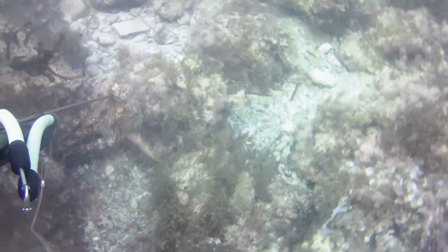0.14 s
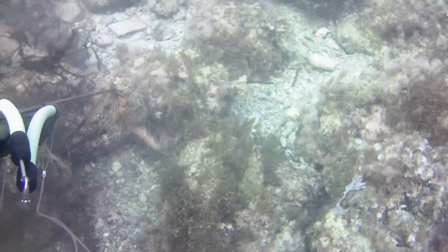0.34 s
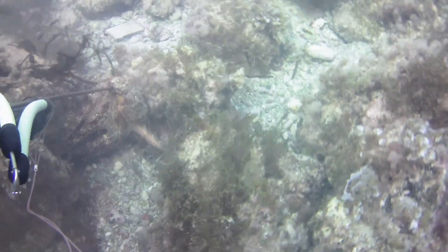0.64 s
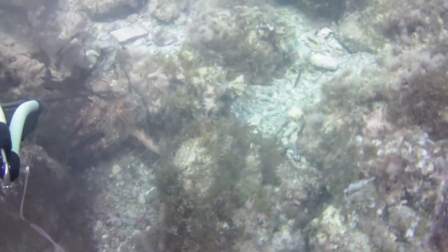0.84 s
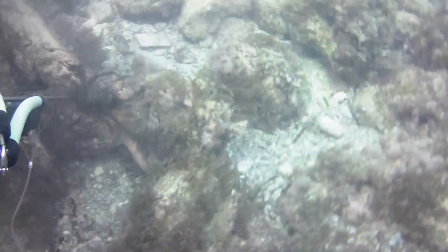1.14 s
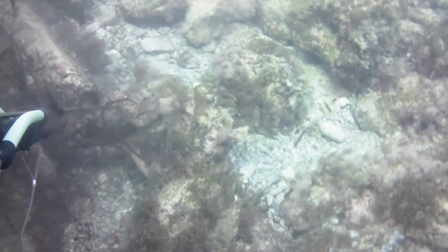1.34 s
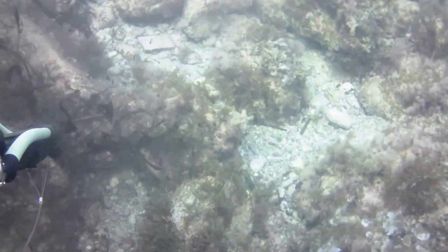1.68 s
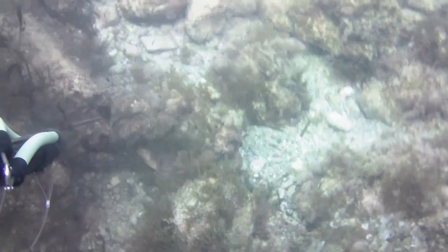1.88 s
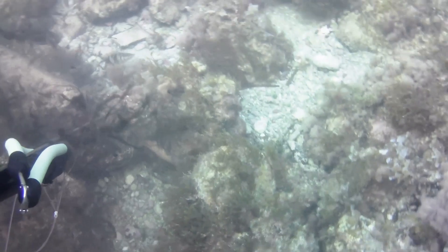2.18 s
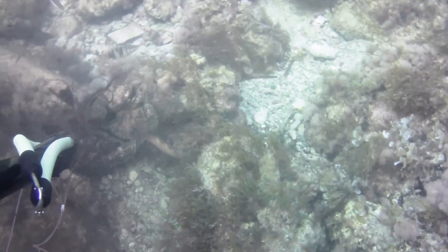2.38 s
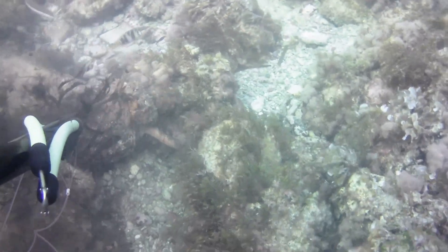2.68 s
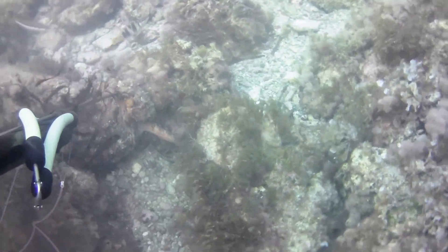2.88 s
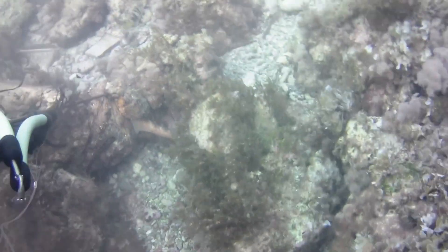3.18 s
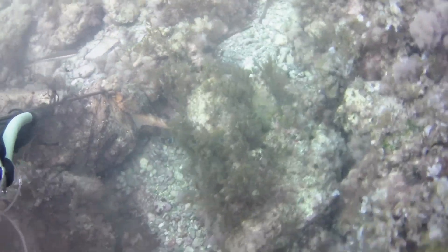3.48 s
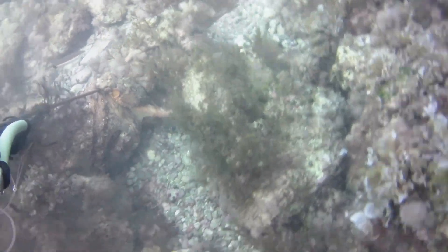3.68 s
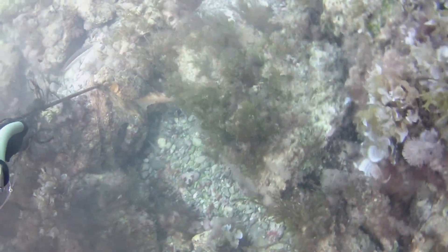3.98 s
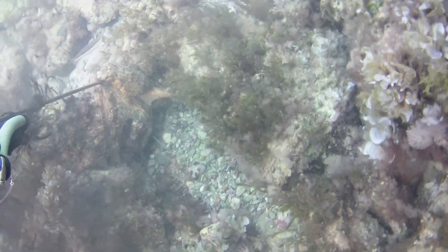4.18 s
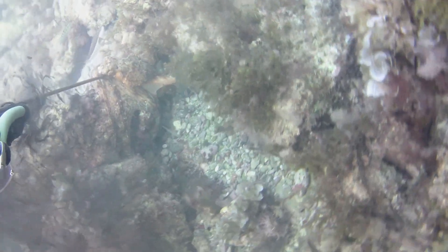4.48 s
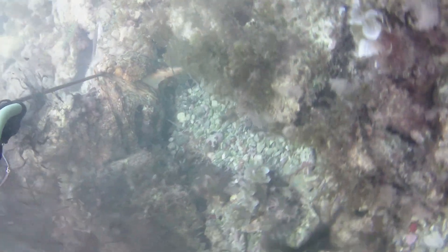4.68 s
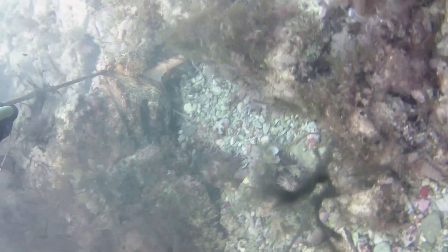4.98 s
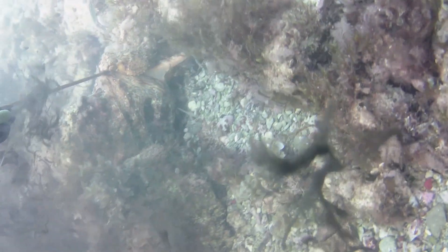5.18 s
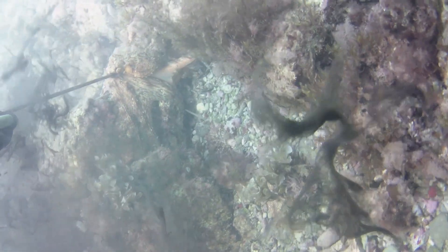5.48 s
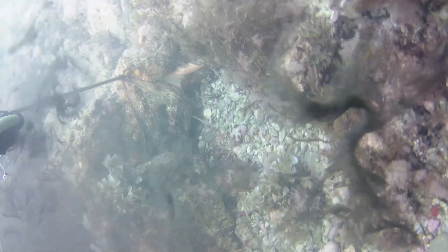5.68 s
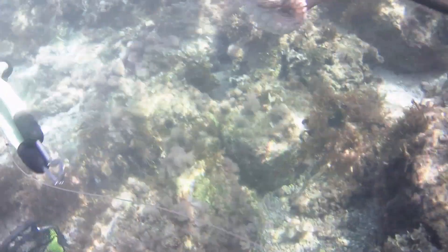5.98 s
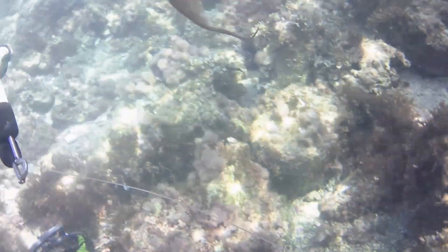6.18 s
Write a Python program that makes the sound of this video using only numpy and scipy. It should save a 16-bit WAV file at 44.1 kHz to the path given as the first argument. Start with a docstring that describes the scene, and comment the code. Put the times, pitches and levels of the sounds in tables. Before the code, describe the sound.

Heard from inside a waterproof case, a speargun fires with a violent double crack, then knocks, quiet clicks and a low watery wash trail off.

```python
"""Speargun shot over a shallow reef

The microphone sits inside a waterproof camera housing, close to a band-powered speargun: the trigger
clacks, the bands slam home and thuds follow. Blows, bumps, ticks and scrapes are short forces ringing the
housing's resonances; heavy blows also boom in the gun's body, and shoves leave it shuddering. Shaped
noise and ringing bubbles make the moving water, with far shrimp and a faint hiss behind."""
import sys
import numpy as np
from scipy import signal
from scipy.fft import rfft, irfft
from scipy.io import wavfile

SR = 44100
rng = np.random.default_rng(int(sys.argv[2]) if len(sys.argv) > 2 else 0)


def unload_wav(signal):
    """Save mono or channel-first audio to the path in sys.argv[1] as 16-bit WAV at rate SR, clipped to [-1, 1]."""
    wavfile.write(
        sys.argv[1],
        SR,
        np.round(np.clip(np.atleast_2d(signal).T, -1, 1) * 32767).astype(np.int16),
    )


N = 279594
AGE = np.arange(SR // 2) / SR   # seconds since a contact

# All levels are relative: a layer's own gain and the scene's gain come on top.
# Trigger release and recoil, then the bands' slam and rebound:
# start_s, level_db (peak of the ring), hardness_hz, rattle_db (against the push),
# main_db, second_db, low_db (housing modes), tuning (factor on the main mode, raises only),
# boom_db, boom_hz, rise_s, damping (factor), thump_db, body_tuning (factor)
SHOT_BLOWS = [(1.8406, 4, 6500, -18, -2, 3.5, -2.5, 0.94, -13.5, 183, .003, 1.8, -40.5, 0.99),
              (1.8450, -5, 804, -27, 0, 9.5, -2.5, 1.0, -23, 187, .0024, 1.8, -45, 0.76),
              (1.8492, -9, 802, -27, 2, 9.5, -3, 1.0, -20, 244, .002, 1.17, -45, 1.0),
              (1.8932, -0.5, 2600, -15, 10.5, 0.5, 11, 0.98, -1.5, 230, .003, 1.48, -20, 0.95),
              (1.9020, -10.5, 600, -22, 15, -1.5, 1.5, 1.0, -36, 192, .0046, 1.2, -41.5, 1.0)]
# Blows on the gun, columns as for the shot
KNOCK_BLOWS = [(0.6232, -21, 900, -26.5, 4, -4, 7, 1.01, -30, 245, 0.0057, 0.67, -40.5, 1.01),
               (0.8760, -23, 1100, -17, 3.5, -12, -5, 1.074, -20.5, 245, 0.012, 0.52, -61, 0.98),
               (0.933, -39, 900, -11, -4, -12.5, 1, 1.1, -24, 251, 0.012, 0.98, -68, 1.03),
               (2.4732, -6, 900, -30.5, -1.5, -4.5, -3, 1.047, -13.5, 168.4, 0.0042, 0.81, -40, 1.0),
               (2.4806, -22.5, 991, -37, 2.5, 2.5, 9, 1.05, -27.5, 290, 0.002, 1.02, -48, 0.95),
               (2.9174, -12.5, 733, -32, 8.5, -3.5, 10, 1.0, -16.5, 179.2, 0.0021, 1.3, -30.5, 1.0),
               (2.9230, -16.5, 1010, -25.5, 0, 4, 15, 1.0, -11.5, 238.4, 0.00099, 1.63, -39.5, 1.0),
               (3.0040, -19, 900, -23, 0, 1.5, 0, 1.02, -27, 273, 0.0019, 1.02, -38, 0.96),
               (3.027, -42, 900, -17, -11, -3, -0.5, 1.05, -33.5, 150, .0036, 1.4, -49.5, 1.0),
               (3.4095, -25.5, 744, -31, 7, -4, -8, 1.03, -34, 225, 0.0046, 0.78, -43, 1.0)]
# Soft bumps on the housing: start_s, level_db, hardness_hz, boom_db, boom_hz
SOFT_BUMPS = [(0.331, -39, 680, -55.5, 160), (0.531, -35.5, 900, -44.5, 145), (0.742, -40, 600, -54, 245),
              (0.791, -62, 405, -45, 185), (0.872, -32, 1000, -51, 245), (0.914, -38, 1200, -42, 245),
              (1.027, -42.5, 775, -42, 210), (1.328, -33, 626, -40, 250), (1.397, -35, 586, -40, 250),
              (1.454, -35, 650, -39.5, 235), (1.493, -38, 1110, -39, 240), (1.678, -61, 450, -45.5, 190),
              (1.972, -36.5, 1000, -39.5, 175), (2.124, -30, 1064, -50, 180), (2.141, -35.5, 556, -61, 180),
              (2.432, -36.5, 790, -57, 180), (2.519, -31.5, 790, -48.5, 245), (2.619, -46, 450, -52.5, 245),
              (2.708, -45, 570, -70, 180), (2.754, -38, 701.5, -54, 200), (2.817, -37.5, 599, -64, 180),
              (2.992, -35, 900, -42, 246), (3.058, -42.5, 1000, -46, 245), (3.083, -40, 900, -35, 170),
              (3.095, -29.5, 600, -56, 230), (3.194, -31.5, 896, -60, 180), (3.223, -28.5, 605, -39, 234.6),
              (3.708, -38, 1600, -61.5, 200), (3.922, -41, 800, -51, 245), (3.988, -38, 1192, -69, 245),
              (4.072, -44, 1100, -72.5, 245), (4.127, -37.5, 501, -70, 245), (4.189, -34, 950, -69, 245),
              (4.79, -41, 900, -62, 245), (4.862, -44.5, 590, -52.5, 190), (5.014, -43.5, 813, -72, 245),
              (5.033, -37.5, 697, -69, 245), (5.226, -35, 1150, -62, 245), (5.329, -42, 1000, -69, 245),
              (5.412, -47, 900, -60, 230), (5.422, -34, 900, -47, 230), (5.458, -36, 990, -67.5, 245),
              (5.509, -39.5, 1290, -68.5, 245), (5.553, -42, 1098, -65, 245),
              (5.588, -39.5, 1088, -76.5, 245), (5.699, -39.5, 1200, -72, 245),
              (5.985, -35, 590, -57.5, 200), (6.043, -40.5, 1110, -72, 245), (6.263, -41, 700, -53.5, 180),
              (6.322, -34, 1000, -56, 180)]
# Sharp ticks, from line and reef life and from hard clicks within the gun's knocks: start_s, level_db,
# pitch_hz, rattle_db, width_octaves
SHARP_TICKS = [(0.166, -37.5, 1800, -11, 1.53), (0.248, -58, 2600, -12, 1.4), (0.379, -51, 3550, -12, 0.9),
               (0.538, -56, 1800, -6, 1), (0.66, -41, 2300, -13, 0.55), (0.672, -49, 2000, -6, .7),
               (0.6956, -47, 3900, -10, 0.96), (0.8795, -39, 1640, -15, 0.59),
               (0.981, -52.5, 1990, -12, .6), (1.1986, -50, 2320, -6, 1.16), (1.25, -54, 1910, 1, 0.27),
               (1.3216, -48.5, 2400, -5, 2), (1.378, -49.5, 2020, -6, 1.6),
               (1.4523, -48.5, 1700, -12, 0.78), (1.516, -33.5, 2450, -4, 0.92),
               (2.057, -49, 4860, -13, 1.1), (2.1065, -52.5, 3800, -28.5, 1.05),
               (2.138, -38, 2200, -5, 1.5), (2.2357, -46, 4710, -12, 1.17), (2.272, -50, 2000, -15, 1.3),
               (2.392, -45.5, 1480, -4, 1.24), (2.4733, -31, 2970, -31, 0.23),
               (2.486, -42.5, 1800, -10, 0.78), (2.7534, -35.5, 1600, 0, 1.56),
               (2.9245, -39.5, 4000, -9, 0.9), (2.928, -35, 3900, -8.5, 0.95),
               (2.9328, -37.5, 4000, -8, 1.1), (2.945, -40, 3320, -8, 1), (3.1043, -40, 2620, 14, 1.1),
               (3.144, -47.5, 3000, -10, 0.35), (3.2224, -30.5, 1940, -12.5, 1.2),
               (3.3642, -47.5, 1900, -6, 2.1), (3.395, -44.5, 1180, -13, 0.73),
               (3.504, -51.5, 2130, 9.5, 0.92), (3.632, -54, 2160, -20.5, 0.65),
               (3.7406, -38.5, 1795, -5, 0.87), (3.8162, -42, 3270, -8, 1.1), (3.9236, -41, 1700, -20, 1.6),
               (4.03, -57.5, 4680, -20, 1.06), (4.386, -35.5, 2320, -5, 1.54),
               (4.722, -43.5, 2930, -14, 0.82), (4.83, -51, 2010, -3, .4), (4.893, -46, 1450, -1, 0.87),
               (5.034, -31, 2573, -10, 1.25), (5.1530, -33.5, 2650, -19, 1.44),
               (5.331, -57, 2200, -12, 1.02), (5.4213, -46, 3200, -2, 0.28), (5.430, -47, 3150, 4, .3),
               (5.467, -42.5, 3300, -4, 0.57), (5.501, -56.5, 1840, -8, .4), (5.861, -51, 2180, -15, 1)]
# Housing resonances, main and second first, the two low ones last: pitch_hz, width_hz, level_db
HOUSING_MODES = [(566, 36, 0), (713, 36, -3), (865, 70, -6), (985, 110, -11), (1265, 100, -12),
                 (1450, 100, -17), (1605, 120, -12.5), (2040, 170, -13), (2460, 200, -14.5),
                 (3020, 150, -12), (3550, 300, -25), (4170, 250, -20.5), (5200, 600, -31),
                 (7100, 1400, -33), (10500, 3000, -43), (453, 40, -13), (405, 70, -15)]
# Low modes of the gun's body before tuning and damping: pitch_hz, t60_s
BODY_MODES = [(95, 0.15), (142, 0.24), (180, 0.17), (245, 0.1), (305, 0.065)]
# Gritty scrapes of line and gear: start_s, length_s, level_db, low_hz, high_hz
LINE_SCRAPES = [(0.662, 0.032, -60.5, 1800, 3400), (0.685, 0.024, -61, 2760, 5200),
                (0.883, 0.03, -69.5, 2470, 6200), (1.872, 0.046, -40, 1495, 4500),
                (2.913, 0.025, -42, 1200, 2200), (4.756, 0.19, -70.5, 900, 1892),
                (4.943, 0.09, -69, 788, 1980), (5.406, 0.055, -64, 2620, 3550),
                (5.44, 0.044, -63, 1500, 3200), (6.246, 0.13, -58, 790, 1370)]
# Shoves that set the gun shuddering: start_s, level_db
GUN_SHOVES = [(0.0, -62.5), (0.53, -61), (0.87, -55), (1.44, -58), (1.85, -47.5), (2.12, -53.5),
              (2.5, -56.5), (2.92, -51)]
# Single bubbles: start_s, level_db, pitch_hz, rise_s, t60_s, slide_octaves_per_s
SINGLE_BUBBLES = [(0.712, -37, 420, 0.0015, 0.03, 3), (1.972, -43, 900, 0.0026, 0.044, -1),
                  (2.302, -39, 443, 0.0016, 0.042, -5), (4.767, -47, 1260, .002, .03, -2.5),
                  (4.792, -37, 504, 0.0006, 0.034, 14), (4.813, -38.5, 770, .0006, 0.08, 4.5),
                  (4.855, -48, 869, .003, 0.052, 5.5), (4.884, -33, 534.6, 0.021, .1, 4),
                  (4.947, -46, 844, .005, 0.053, 5), (5.4215, -39.5, 487, 0.0018, 0.053, 8),
                  (5.458, -51, 640, 0.00055, 0.045, 14), (5.226, -43, 520, 0.0022, .04, -13),
                  (5.329, -44.5, 569, .001, 0.061, -3.5), (5.558, -36.5, 482, 0.0017, 0.031, -2),
                  (5.599, -41.5, 443, 0.0019, 0.034, 7)]
# Swirls of water against the case: start_s, length_s, level_db, low_hz, high_hz
WATER_SWIRLS = [(0.998, 0.13, -55.5, 523, 900), (4.115, 0.12, -53, 296, 592),
                (4.294, 0.27, -67.5, 330, 514), (6.257, 0.16, -50.5, 266, 856)]
# Water moving past the case: time_s, level_db
FLOW_LEVEL = [(0.0, -65.5), (0.39, -66), (0.78, -57.5), (1.77, -65), (1.99, -56.5), (2.14, -60),
              (2.59, -57.5), (2.77, -63), (2.93, -59), (3.44, -64), (3.55, -63), (3.92, -62.5),
              (4.1, -63.5), (5.0, -60.5), (5.21, -65), (5.54, -58.5), (5.83, -63.5), (6.34, -64)]
# Rumble of the hand working the gun: time_s, level_db
HANDLING_LEVEL = [(0.0, -61), (0.35, -74), (0.74, -58), (1.15, -61), (1.8, -64), (1.93, -53), (2.21, -63),
                  (2.58, -61), (2.84, -70), (3.0, -59), (3.49, -69.5), (4.68, -81), (5.05, -74.5),
                  (5.76, -83), (6.34, -74.5)]
# Colour of the wash: pitch_hz, density_db (per Hz)
WASH_SPECTRUM = [(71, -53.5), (120, -18.5), (344, -15), (473, -7.5), (560, 3), (649, -16), (703, -13),
                 (761, -13), (833, -9.5), (976, -10.5), (1170, -14), (1610, -35), (1800, -30), (2340, -59),
                 (3960, -120)]
# Colour of the handling rumble: pitch_hz, density_db (per Hz)
RUMBLE_SPECTRUM = [(13, -30.5), (22, -9), (45, -9), (114, -8), (173, -5.5), (204, -11), (247, -6.5),
                   (320, -17.5), (420, -47), (700, -120)]
# Colour of the fizz before its treble is dulled: pitch_hz, density_db (per Hz)
FIZZ_SPECTRUM = [(820, -30.5), (1400, -0.5), (1780, -13.5), (2000, 0.5), (2340, -13), (2730, -16.5),
                 (3050, -3), (3470, -15), (5330, -19.5), (6350, -21.5), (7420, -19), (7980, -18),
                 (8430, -20.5), (11900, -23.5), (12500, -27.5), (16200, -79), (22000, -120)]

TRIGGER_S, SLAM_END_S = SHOT_BLOWS[0][0], SHOT_BLOWS[-1][0]


def blows(table, rattle_t60_s, order, thin_hz):
    """Each blow rings the housing and sets the gun flexing."""
    out = np.zeros(N)
    for s, db, hardness_hz, rattle_db, main_db, second_db, low_db, tuning, *boom in table:
        push = contact(hardness_hz, rattle_db, rattle_t60_s, order)
        force = cut(push, thin_hz, "high", order=3)
        ring = peak_one(housing(force, main_db, second_db, low_db, tuning))
        add(out, s, from_db(db) * ring + flex(*boom))
    return out


def shaft(level_db=-25.5, dull_hz=650):
    """The spear rumbles along its track, as dull noise in the housing, until the bands slam home."""
    rub = np.zeros(N)
    add(rub, TRIGGER_S, rng.standard_normal(len(AGE)) * swell(SLAM_END_S - TRIGGER_S))
    return from_db(level_db) * peak_one(housing(cut(rub, dull_hz, "low"), main_db=-6.0))


def spray(level_db=-49, fade_db_per_s=428.5, thin_hz=2000, dull_hz=7000, direct_db=-28):
    """Tiny cavities collapse after the bands slam home: a bright crackle that dies away."""
    pops = cut(grains(per_s=700, spread_db=8), thin_hz, "high")
    pops = cut(pops, dull_hz, "low", order=4)
    crackle = rms_one(housing(pops) + from_db(direct_db) * pops)
    return fading(SLAM_END_S, level_db, fade_db_per_s) * crackle


def contact(hardness_hz, rattle_db, rattle_t60_s, order):
    """One push followed by a dying rattle; a soft contact has no treble."""
    force = from_db(rattle_db - 60 * AGE / rattle_t60_s) * rng.standard_normal(len(AGE)) / 2
    force[0] += 1
    return cut(force, hardness_hz, "low", order=order)


def housing(force, main_db=0, second_db=0, low_db=0, tuning=1, scatter_db=0):
    """The case rings; the place hit sets its mode strengths, a tight grip raises its main pitch."""
    hz, width_hz, db = np.array(HOUSING_MODES, float).T
    db = db + scatter_db * rng.standard_normal(len(db))
    db[:2] += main_db, second_db
    db[-2:] += low_db
    hz[0] *= max(tuning, 1)
    gains = from_db(db) * (-1.0) ** np.arange(len(db))   # successive modes alternate in sign
    return sum(gain * resonance(force, f, width) for gain, f, width in zip(gains, hz, width_hz))


def resonance(force, hz, width_hz):
    """One damped mode as a two-pole filter, gain 1 on top."""
    r = np.exp(-np.pi * width_hz / SR)
    feed = np.array([1, 0, -1]) * (1 - r * r) / 2
    back = [1, -2 * r * np.cos(2 * np.pi * hz / SR), r * r]
    return signal.lfilter(feed, back, force + 1e-18)


def flex(boom_db, boom_hz, rise_s, damping, thump_db=-90, tuning=1):
    """The gun's body booms, most near its boom pitch, damped by the water; a shove thumps the lowest mode."""
    hz, t60_s = np.array(BODY_MODES).T
    away_octaves = np.abs(np.log2(hz / boom_hz))
    gains = from_db(boom_db - np.minimum(38 * away_octaves, 21.5))   # 38 dB per octave, 21.5 dB at most
    gains[0] = from_db(thump_db)
    modes = np.zeros(len(AGE))
    for gain, f, t60 in zip(gains, hz, t60_s):
        modes += gain * from_db(-60 * damping * AGE / t60) * np.sin(2 * np.pi * f * tuning * AGE)
    return cut(modes * (1 - np.exp(-AGE / rise_s)), 65, "high")


def bumps(gain_db=-6, thin_hz=240, direct_db=-19):
    """Hand and gear bump the housing, some dull and some hard; the gun booms along."""
    out = np.zeros(N)
    for s, db, hardness_hz, boom_db, boom_hz in SOFT_BUMPS:
        push = contact(hardness_hz, rattle_db=-18.5, rattle_t60_s=0.074, order=4)
        force = cut(push, thin_hz, "high")
        ring = peak_one(housing(force, main_db=2.0, scatter_db=5.0) + from_db(direct_db) * force)
        boom = flex(boom_db, boom_hz, rise_s=0.0018, damping=1.0)
        add(out, s, from_db(db + gain_db) * ring + boom)
    return out


def ticks(gain_db=-4.5, direct_db=-30):
    """Tiny hard snaps, each in a band round its own pitch; part of the crack passes straight through."""
    out = np.zeros(N)
    for s, db, hz, rattle_db, octaves in SHARP_TICKS:
        edge = 2 ** (octaves / 2)
        snap = contact(hz * edge, rattle_db, rattle_t60_s=0.022, order=5)
        force = cut(snap, hz / edge, "high", order=5)
        ring = peak_one(housing(force) + from_db(direct_db) * force)
        add(out, s, from_db(db + gain_db) * ring)
    return out


def scrapes(direct_db=-28):
    """Uneven little slips crackle through the case and drive its resonances."""
    out = np.zeros(N)
    for s, length_s, db, low_hz, high_hz in LINE_SCRAPES:
        slips = cut(grains(per_s=360, spread_db=8)[:len(AGE)], high_hz, "low", order=4)
        slips = cut(slips, low_hz, "high", order=3)
        crackle = rms_one(housing(slips, scatter_db=5.0) + from_db(direct_db) * slips)
        add(out, s, from_db(db) * crackle * swell(length_s))
    return out


def sway(hz=41.3, t60_s=0.96, rise_s=0.015):
    """Each shove leaves the whole gun shuddering in one deep, slow mode."""
    out, age = np.zeros(N), np.arange(2 * SR) / SR
    envelope = from_db(-60 * age / t60_s) * (1 - np.exp(-age / rise_s))
    shudder = envelope * np.sin(2 * np.pi * hz * age)
    for s, db in GUN_SHOVES:
        add(out, s, from_db(db) * shudder)
    return out


def blips():
    """Single bubbles swell, ring and die away while their pitch slides."""
    out = np.zeros(N)
    for s, db, hz, rise_s, t60_s, slide in SINGLE_BUBBLES:
        pitch_hz = hz * 2 ** (slide * np.minimum(AGE, t60_s / 2))   # the slide stops at half the t60
        phase = 2 * np.pi * np.cumsum(pitch_hz) / SR
        envelope = from_db(db - 60 * AGE / t60_s) * (1 - np.exp(-AGE / rise_s))
        add(out, s, envelope * np.sin(phase))
    return out


def swirls():
    """Brief rushes of many small ringing bubbles."""
    out = np.zeros(N)
    for s, length_s, db, low_hz, high_hz in WATER_SWIRLS:
        rush = gurgle(260, low_hz, high_hz)[:len(AGE)]
        add(out, s, from_db(db) * rush * swell(length_s))
    return out


def gurgle(per_s, low_hz, high_hz, sharpness=12, count=10):
    """Small bubbles of many sizes ring for a few cycles; rms 1."""
    clicks = grains(per_s, spread_db=6.5)
    size = rng.integers(0, count, N)   # each click is dealt to one bubble size
    pitches_hz = np.geomspace(low_hz, high_hz, count)
    rings = sum(resonance(clicks * (size == k), hz, hz / sharpness) for k, hz in enumerate(pitches_hz))
    return rms_one(cut(cut(rings, low_hz / 2, "high"), 1300, "low", order=4))


def water(wash_gain_db=-5, gurgle_db=-5, rumble_gain_db=-3):
    """Water washes and gurgles round the case in uneven swells; blows stir it, the hand rumbles."""
    flow_db, handling_db = in_time(FLOW_LEVEL), in_time(HANDLING_LEVEL)
    surge = from_db(3.6 * drift(16))
    # every blow except the trigger's first stirs the water by its own level, and the water settles again
    stirred = sum(fading(s, db - 51.5, fade_db_per_s=75.5) for s, db, *_ in SHOT_BLOWS[1:] + KNOCK_BLOWS)
    wash = from_db(wash_gain_db) * noise(WASH_SPECTRUM) * surge
    bubbles = from_db(gurgle_db) * gurgle(per_s=26, low_hz=316, high_hz=900)
    rumble = from_db(handling_db + rumble_gain_db) * noise(RUMBLE_SPECTRUM)
    return np.hypot(from_db(flow_db), stirred) * (wash + bubbles) + rumble + fizz(flow_db, surge)


def fizz(flow_db, surge, level_db=-79.5, follows=0.13, patchy_db=3):
    """Fine bubbles hiss, following a share of the flow's swing; the shot leaves a fading cloud of them."""
    steady = from_db(level_db + follows * (flow_db - flow_db.mean()))
    cloud = fading(TRIGGER_S, -76.5, fade_db_per_s=4.5)
    patchy = from_db(patchy_db * drift(45))
    return np.hypot(steady, cloud) * cut(noise(FIZZ_SPECTRUM), 5400, "low") * surge * patchy


def reef(level_db=-82.0, count=8):
    """Far shrimp crackle densely at eight pitches, heard through the housing."""
    snaps = sum(resonance(grains(5, 7), hz, hz / 3) for hz in np.geomspace(1000, 3600, count))
    return from_db(level_db) * rms_one(cut(housing(snaps), 900, "high", order=3))


def hiss(level_db=-85.5):
    """Faint steady noise with its top rolled off."""
    return from_db(level_db) * rms_one(cut(rng.standard_normal(N), 12200, "low", order=10))


def dropout(start_s=5.897, end_s=5.978, edge_s=0.0065, depth_db=-49.5):
    """Gain of a brief gap in the sound, with short sloping edges."""
    t = np.arange(N) / SR
    inside = np.minimum(t - start_s, end_s - t) / edge_s
    return from_db(depth_db * np.clip(inside, 0, 1))


def from_db(db):
    """Decibels to gain."""
    return 10 ** (np.asarray(db) / 20)


def rms_one(x):
    """Scale to unit rms."""
    return x / np.sqrt(np.mean(x ** 2) + 1e-20)


def peak_one(x):
    """Scale to unit peak."""
    return x / (np.abs(x).max() + 1e-20)


def in_time(rows):
    """A level curve at every sample."""
    s, db = np.transpose(rows)
    return np.interp(np.arange(N) / SR, s, db)


def add(track, s, sound):
    """Mix a sound into a track at time s."""
    start = round(s * SR)
    track[start:start + len(sound)] += sound[:max(N - start, 0)]


def cut(x, hz, kind, order=2):
    """Causal low- or high-pass."""
    return signal.sosfilt(signal.butter(order, hz, kind, fs=SR, output="sos"), x + 1e-18)


def noise(spectrum):
    """Noise of a given colour, falling 60 dB per octave beyond its ends; rms 1."""
    hz, db = np.transpose(spectrum)
    octave = np.log2(np.arange(N // 2 + 1) * SR / N + 1)
    outside = np.abs(octave - np.clip(octave, np.log2(hz[0]), np.log2(hz[-1])))
    gain = from_db(np.interp(octave, np.log2(hz), db) - 60 * outside)
    return rms_one(irfft(rfft(rng.standard_normal(N)) * gain, N))


def drift(rate_hz):
    """Slow chance with spread 1."""
    return rms_one(cut(rng.standard_normal(N), rate_hz, "low"))


def grains(per_s, spread_db):
    """Random clicks of uneven size and sign."""
    sizes = from_db(spread_db * rng.uniform(-1, 1, N)) * rng.choice([-1, 1], N)
    return sizes * (rng.random(N) < per_s / SR)


def swell(length_s):
    """A smooth rise and fall."""
    return np.sin(np.pi * np.minimum(AGE / length_s, 1))


def fading(start_s, db, fade_db_per_s):
    """A gain that jumps up at start_s and dies away."""
    age = np.arange(N) / SR - start_s
    return (age > 0) * from_db(db - fade_db_per_s * np.maximum(age, 0))


def scene(level_db=3.5):
    """Gun, small contacts and water over a faint hiss."""
    shot = blows(SHOT_BLOWS, rattle_t60_s=0.026, order=1, thin_hz=169.0) + shaft() + spray()
    knocks = blows(KNOCK_BLOWS, rattle_t60_s=0.071, order=5, thin_hz=412)
    contacts = bumps() + ticks() + scrapes() + sway()
    wet = blips() + swirls() + water()
    mix = shot + knocks + contacts + wet + reef() + hiss()
    return (from_db(level_db) * mix * dropout())[None]


def record(dry):
    """The shot overloads the microphone, which limits smoothly near full scale; the top is cut."""
    clipped = dry / (1 + (dry / .96) ** 8) ** (1 / 8)
    top_cut = signal.ellip(10, .1, 80, 15900, fs=SR, output="sos")   # steep, above 15.9 kHz
    return signal.sosfilt(top_cut, clipped)


dry = scene()
out = record(dry)
unload_wav(out)
```